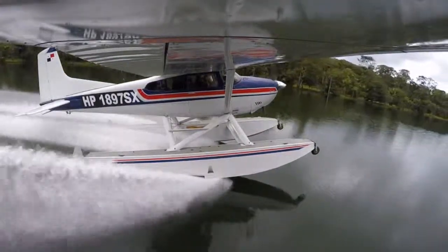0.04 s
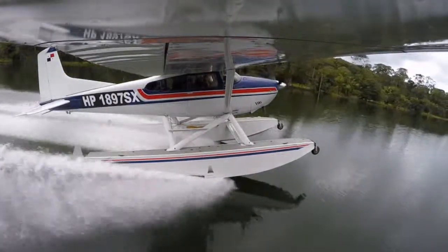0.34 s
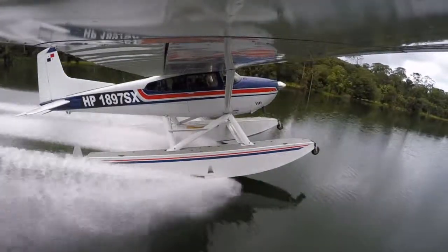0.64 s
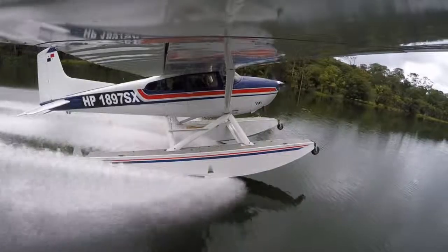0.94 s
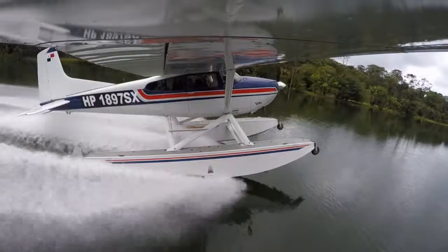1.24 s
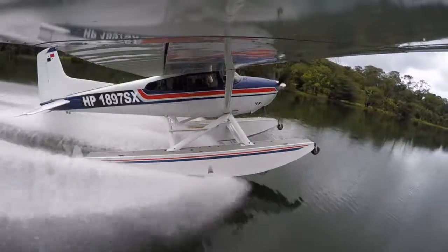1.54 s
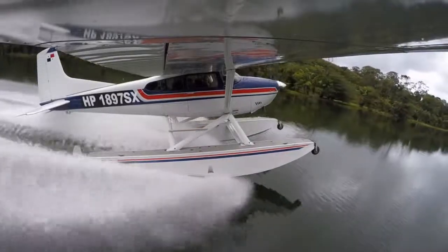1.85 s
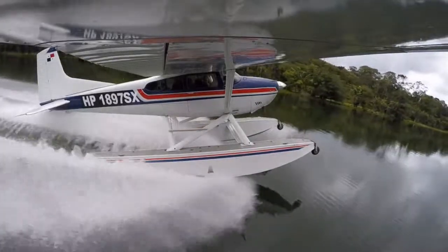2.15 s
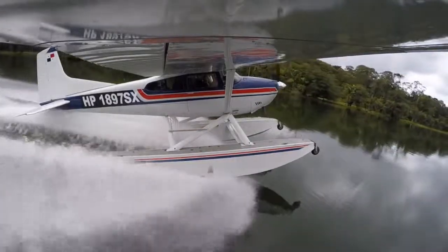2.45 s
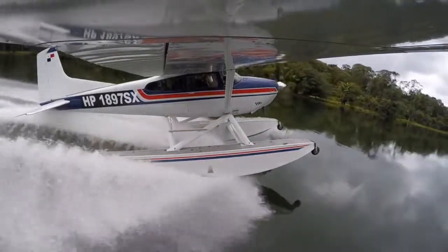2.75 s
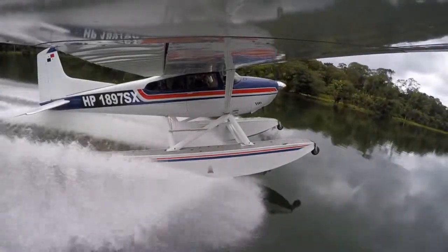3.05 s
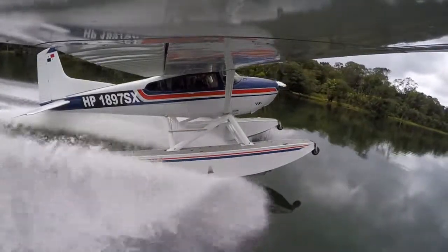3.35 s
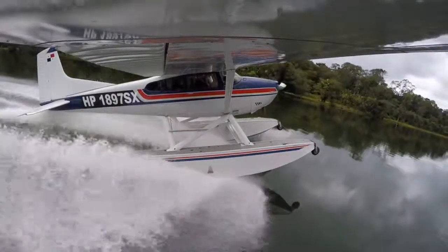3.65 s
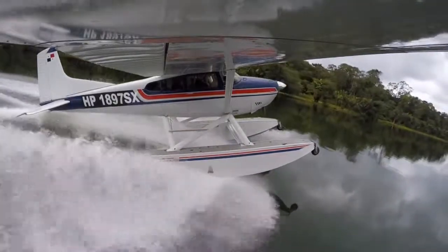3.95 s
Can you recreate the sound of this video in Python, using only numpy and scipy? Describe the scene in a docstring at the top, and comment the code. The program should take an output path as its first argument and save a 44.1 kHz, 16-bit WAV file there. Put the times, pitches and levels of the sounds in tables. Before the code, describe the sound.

A float plane's engine drones and rumbles under hissing water spray and buffeting wind.

```python
"""On the wing strut of a float plane skimming along a river, microphone inside a plastic camera housing. At
first spray hisses from the floats below, over engine shake, strut drone and buffeting slipstream; air and spray
come through the ringing housing. From 1 s the hardest gusts of buffeting thump the mount, then the hiss slowly
fades, and from 2.3 s larger drops tick on the case. The hardest thump lands at 3 s and the drone swells; by 3.5
s the spray is almost gone, leaving engine, rumble and wind."""
import sys
import numpy as np
from scipy import signal
from scipy.fft import rfft, irfft, next_fast_len
from scipy.io import wavfile
from scipy.ndimage import uniform_filter1d, map_coordinates

SR = 44100
rng = np.random.default_rng(int(sys.argv[2]) if len(sys.argv) > 2 else 0)


def dump_mix(stems):
    """Bounce the given channels to the path in sys.argv[1] as a 16-bit WAV at rate SR."""
    frames = np.atleast_2d(stems).T  # one column per channel
    limited = np.clip(frames, -1, 1)  # hard clip at full scale
    pcm = np.round(limited * 32767).astype(np.int16)
    wavfile.write(sys.argv[1], SR, pcm)


N = 176400


def amp(db):
    return 10 ** (np.asarray(db) / 20)


def unit_rms(x):
    return x / np.sqrt(np.mean(x ** 2) + 1e-20)


def spectrum_db(points, hz):
    """Levels interpolated on a log frequency axis."""
    freqs, levels = np.transpose(points)
    return np.interp(np.log(hz + 1), np.log(freqs + 1), levels)


def curve(rows):
    """(time, value) rows interpolated to one value per sample."""
    return np.interp(np.arange(N) / SR, *np.transpose(rows))


def wobble(knots_per_s):
    """A smooth random curve."""
    knots = rng.standard_normal(2048)
    return map_coordinates(knots, [np.arange(N) * knots_per_s / SR], mode="wrap")


def filtered(x, gain):
    """x shaped by a gain that is a function of frequency."""
    size = next_fast_len(N + SR // 2)
    return irfft(rfft(x, size) * gain(np.fft.rfftfreq(size, 1 / SR)), size)[:N]


def patchy_noise(patchy_db):
    """White noise with drifting patches of random gain."""
    bins = signal.stft(rng.standard_normal(N), nperseg=512)[2]
    patches = uniform_filter1d(rng.standard_normal(bins.shape), size=6, axis=0)
    patches = uniform_filter1d(patches, size=10, axis=1)
    return signal.istft(bins * amp(patchy_db * unit_rms(patches)), nperseg=512)[1][:N]


def ring(hz, t60_s, attack_s):
    """One struck mode, half a second long."""
    t = np.arange(SR // 2) / SR
    return np.sin(2 * np.pi * hz * t) * np.exp(-np.log(1000) * t / t60_s) * (1 - np.exp(-t / attack_s))


def add(track, start_s, x):
    """Mixes x into the track."""
    part = track[max(round(start_s * SR), 0):][:len(x)]
    part += x[:len(part)]


# resonances of the plastic around the microphone (frequency [Hz], half width [Hz], lift [dB])
HOUSING_RESONANCES = [(475, 29, 4.5), (763, 22.5, 6.5), (1004, 72, 5.5), (1273, 15.4, 9), (1394, 62, 6),
                      (1628, 100, 7), (1885, 43, 4), (2484, 114, 2), (3660, 284, 10.5), (3913, 140, 1.5),
                      (5290, 220, 3.5), (6150, 57, 5), (6450, 180, 5), (7440, 180, 5.5), (8030, 185, 6),
                      (11470, 810, 3)]


def through_housing(x, spectrum):
    """x takes on its source's spectrum and the housing's resonances, at rms 1."""
    def lift_db(f):
        return sum(db * np.exp(-.5 * ((f - hz) / width) ** 2) for hz, width, db in HOUSING_RESONANCES)
    return unit_rms(filtered(x, lambda f: amp(spectrum_db(spectrum, f) + lift_db(f))))


# low buffeting and higher rush of air, right on the case (time [s], level [dB])
BUFFET_LEVEL = [(0, -22), (.4, -22), (1.2, -19), (1.9, -20), (2.5, -21.5), (3.1, -20), (3.4, -26),
                (3.65, -21.5), (4, -25.5)]
RUSH_LEVEL = [(0, -38.5), (1.4, -33), (2.1, -33.5), (3.0, -31.5), (3.4, -34.5), (3.75, -33), (4, -32)]
# buffeting, rush and fizz outside the housing (frequency [Hz], relative level [dB])
BUFFET_SPECTRUM = [(30, -40), (60, 7), (85, 1.5), (130, -2.5), (160, 0.5), (250, -0.5), (290, -5.5),
                   (400, -16.5), (500, -15.5), (600, -31.5), (1500, -48), (4000, -120)]
RUSH_SPECTRUM = [(100, -25), (400, -4), (600, -0.5), (1200, -2), (1700, -5), (2000, -12.5), (2500, -6.5),
                 (4200, -10.5), (5800, -15.5), (8500, -20.5), (12500, -25.5), (15000, -29)]
FIZZ_SPECTRUM = [(2000, -34), (4500, 5.5), (5300, 0), (8500, -7), (10500, -3), (12500, -6), (15000, -7.5)]


def slipstream(lump_db=0.5, fizz_db=-45.5):
    """Eddies hit the housing in quick, slight lumps that move buffet and rush; the fizz stays even."""
    eddies = amp(lump_db * wobble(45))
    buffet = through_housing(rng.standard_normal(N) * eddies, BUFFET_SPECTRUM)
    rush = through_housing(patchy_noise(patchy_db=1.57) * eddies, RUSH_SPECTRUM)
    fizz = through_housing(rng.standard_normal(N), FIZZ_SPECTRUM)
    return amp(curve(BUFFET_LEVEL)) * buffet + amp(curve(RUSH_LEVEL)) * rush + amp(fizz_db) * fizz


# drone and rumble of the strut under the camera (time [s], level [dB])
DRONE_LEVEL = [(0, -22), (.35, -30), (.5, -18), (.7, -24.5), (1.3, -19.5), (1.55, -21.5), (1.9, -25),
               (2.07, -16.5), (2.35, -29.5), (2.73, -18.5), (2.96, -29), (3.01, -12), (3.2, -13.5),
               (3.35, -18.5), (3.6, -20.5), (3.8, -18.5), (4, -28)]
RUMBLE_LEVEL = [(0, -19), (1.8, -17), (2.7, -20), (3.2, -24), (3.6, -19), (4, -14.5)]
# the deep rumble (frequency [Hz], relative level [dB])
RUMBLE_SPECTRUM = [(8, -40), (17, -42), (24, -29), (32, -10), (42, 7), (55, -3.5), (72, -5.5), (85, -13),
                   (110, -27.5), (250, -37), (600, -120)]


def strut(drone_hz=65.4, drift_hz=0.8, flutter_db=0.9):
    """The strut drones at its resonance over a broad rumble."""
    cycles = np.cumsum(drone_hz + drift_hz * wobble(9)) / SR
    drone = unit_rms(amp(flutter_db * wobble(4)) * np.sin(2 * np.pi * cycles))
    rumble = unit_rms(filtered(rng.standard_normal(N), lambda f: amp(spectrum_db(RUMBLE_SPECTRUM, f))))
    return amp(curve(DRONE_LEVEL)) * drone + amp(curve(RUMBLE_LEVEL)) * rumble


# engine shake, picked up out on the strut (time [s], level [dB])
SHAKE_LEVEL = [(0, -16.5), (.7, -17), (1.1, -20.5), (1.5, -19), (2.4, -15.5), (3.0, -20.5), (4, -18)]
# engine orders (frequency [multiple of the shaft rate], relative level [dB])
ENGINE_ORDERS = [(.5, -11), (1, 0), (2, -12)]


def engine(shaft_hz=34.6, drift_hz=0.76, flutter_db=0.5):
    """The low orders of the shaft shake the airframe, each wavering in strength."""
    turns = np.cumsum(shaft_hz + drift_hz * wobble(5.12)) / SR
    shake = np.zeros(N)
    for order, db in ENGINE_ORDERS:
        strength = amp(db - flutter_db * wobble(7))
        shake += strength * np.sin(2 * np.pi * order * (turns + rng.random()))
    return amp(curve(SHAKE_LEVEL)) * unit_rms(shake)


# larger drops on the case, very close to the microphone (time [s], level [dB], ring [Hz])
DROP_HITS = [(2.331, -30, 805), (2.452, -20, 1405), (2.716, -17, 1350), (2.974, -22, 1050),
             (3.133, -20, 1010), (3.143, -21, 1420), (3.251, -27, 980), (3.436, -27, 1015),
             (3.808, -19.5, 1480)]


def drops(patter_per_s=25, patter_db=-32.5):
    """Each drop rings the case with a brief splash; small ones patter at random throughout."""
    out, t = np.zeros(N), np.arange(SR // 2) / SR
    splash_band = signal.butter(2, [700, 2200], "band", fs=SR, output="sos")
    patter = []
    for when, size, pick in rng.random((int(patter_per_s * N / SR), 3)):
        hz = DROP_HITS[int(pick * len(DROP_HITS))][2]
        patter.append((when * N / SR, patter_db + 6 * size, hz))
    for start_s, db, hz in DROP_HITS + patter:
        burst = 1.79 * rng.standard_normal(len(t)) * np.exp(-t / 0.002)
        splash = signal.sosfilt(splash_band, burst)
        add(out, start_s, amp(db) * (ring(hz, t60_s=.024, attack_s=.00083) + splash))
    return out


# hits that ring the mount: the hardest gusts of buffeting, and the big thump near 3 s (time [s], level [dB])
JOLTS = [(1.052, -21), (1.325, -27), (1.441, -14), (1.997, -19), (2.98, -3.5), (2.985, -5.5), (3.647, -29)]
# modes of the mount (frequency [Hz], relative level [dB], t60 [s])
MOUNT_MODES = [(234, -6.5, 0.1), (278, -8, 0.02), (390, -13, 0.2), (427, -5.5, 0.033), (744, -24, .05),
               (1005, -23, .05)]


def mount_thumps():
    """Each jolt rings all the modes of the mount."""
    out = np.zeros(N)
    thump = sum(amp(db) * ring(hz, t60_s, attack_s=.0016) for hz, db, t60_s in MOUNT_MODES)
    for start_s, db in JOLTS:
        add(out, start_s, amp(db) * thump)
    return out


# spray from the floats below the microphone (time [s], level [dB])
SPRAY_LEVEL = [(0, -21), (.2, -21), (.44, -19.5), (.66, -21.5), (1.0, -21.5), (1.45, -22), (1.8, -25),
               (2.25, -27.5), (2.55, -30.5), (2.85, -34.5), (3.12, -35.5), (3.3, -44.5), (3.55, -48),
               (3.8, -43), (4, -40)]
# spray outside the housing (frequency [Hz], relative level [dB])
SPRAY_SPECTRUM = [(50, -15), (110, 16), (170, 10.5), (260, -12.5), (400, 1), (700, -3.5), (1200, -4),
                  (2000, -2), (3100, 0), (4200, -1), (4700, -15.5), (5800, -19.5), (7000, -17.5),
                  (8600, -22.5), (11500, -29), (15000, -31)]


def spray(surge_db=0.49, grain_db=0.64):
    """Fine droplets thrown up by the floats merge into a dense, slightly surging hiss."""
    mist = patchy_noise(patchy_db=0.37) * amp(surge_db * wobble(13.7) + grain_db * wobble(300))
    return amp(curve(SPRAY_LEVEL)) * through_housing(mist, SPRAY_SPECTRUM)


def scene():
    """Airframe, air and water all reach the one microphone inside the housing."""
    airframe = engine() + strut() + mount_thumps()
    return (airframe + slipstream() + spray() + drops())[None]


def record(dry):
    """The loudest peaks are softly rounded off, both ends fade briefly and the top treble is cut."""
    ceiling, top_hz, fade_s = .9, 15280, .004
    rounded = dry[0] / (1 + np.abs(dry[0] / ceiling) ** 8) ** (1 / 8)
    fade = curve([(0, 0), (fade_s, 1), (N / SR - fade_s, 1), (N / SR, 0)])
    return filtered(rounded * fade, lambda f: f < top_hz)[None]


dry = scene()
out = record(dry)
dump_mix(out)
```